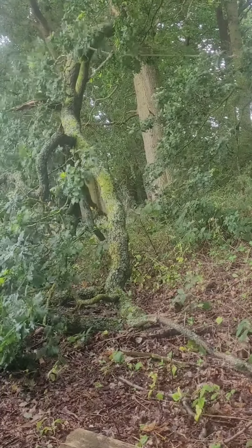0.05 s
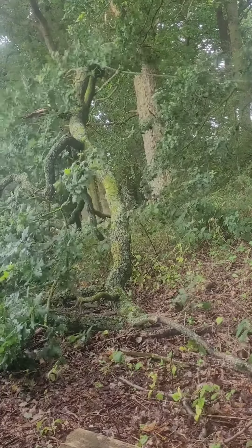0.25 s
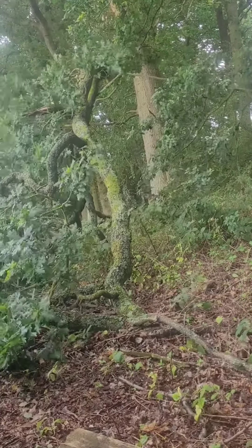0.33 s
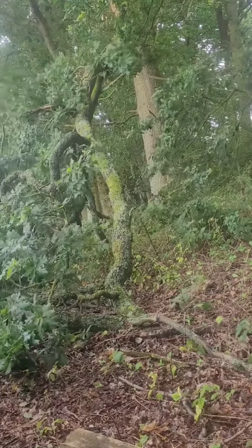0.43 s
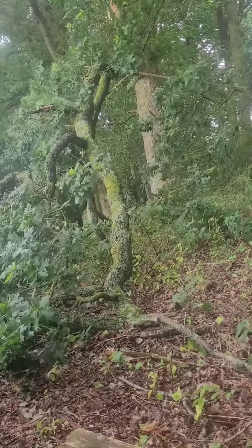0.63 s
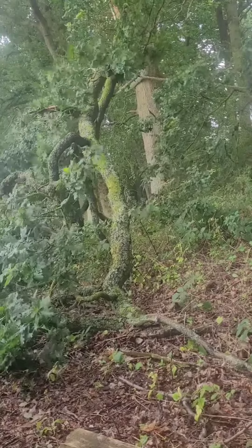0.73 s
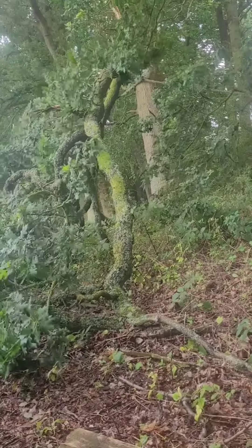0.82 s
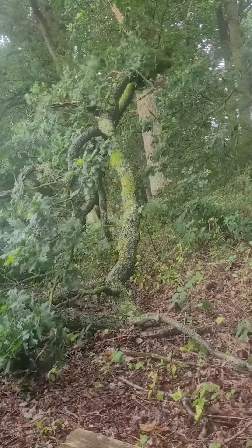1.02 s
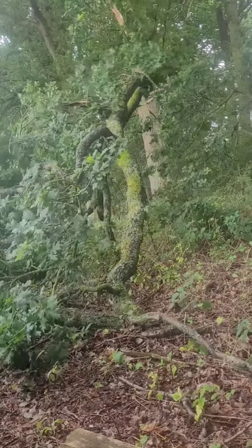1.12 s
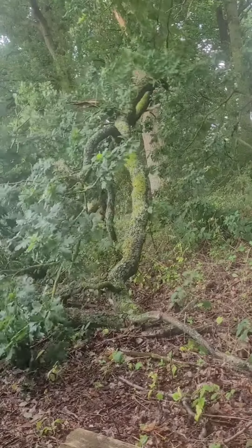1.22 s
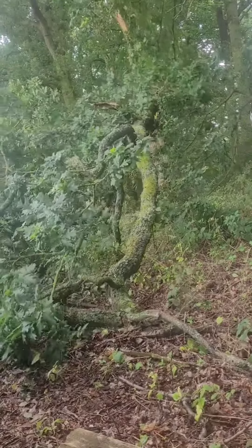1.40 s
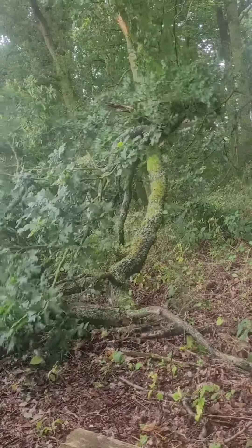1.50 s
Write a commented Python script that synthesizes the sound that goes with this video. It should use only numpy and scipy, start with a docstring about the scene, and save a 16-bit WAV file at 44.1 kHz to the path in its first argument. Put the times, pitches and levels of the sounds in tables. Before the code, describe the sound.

Wood cracking twice loudly as a tree limb comes down with swishing leaves.

```python
"""A leafy oak limb is pulled down in a wood, a few metres from the microphone. From the start, leaves
swish and twigs scrape over a low rumble of air. The fibres tear in a short run, then in two loud
cracks near half a second; each fracture excites the modes of the limb and scatters among the trunks.
From about one second the crown sinks onto the ground: stalks tick, twigs crunch and branches knock."""
import sys
import numpy as np
from scipy import signal
from scipy.fft import rfft, irfft
from scipy.io import wavfile

SR = 44100
rng = np.random.default_rng(int(sys.argv[2]) if len(sys.argv) > 2 else 0)


def file_out(sig):
    """Save sig as 16-bit WAV at sys.argv[1]."""
    # one column per channel
    cols = np.atleast_2d(sig).T
    # limit, then scale
    lim = np.clip(cols, -1, 1)
    pcm = np.round(lim * 32767).astype(np.int16)
    wavfile.write(sys.argv[1], SR, pcm)


N = 68355
T = np.arange(N) / SR
F = np.fft.rfftfreq(2 * N, 1 / SR)

# Fibre bundles breaking: start_s, thud_db, splinter_db, fizz_db, decay_s
FRACTURES = [(0.1433, -41, -29, -16, 0.0024), (.1490, -50, -54, -17, 0.0031),
             (0.2141, -21.5, -23.5, -16, 0.0031), (0.2227, -20.5, -22, -18, 0.0024),
             (0.2315, -34, -29, -19, 0.0011), (0.2433, -20.5, -10, -5.5, 0.0042),
             (.2480, -19, -16.5, -11, 0.01), (0.261, -33, -23, -20, 0.0025), (0.269, -27, -38, -22, 0.0018),
             (0.29, -20, -35, -26, 0.00049), (0.4368, -19.5, -45, -38, 0.0079),
             (0.444, -12.5, -21, -19, 0.0018), (0.4464, -16, -12.5, -5, 0.0048),
             (0.4485, -9, -11.5, -10, 0.0012), (.4560, -4, -13, -7.5, 0.0029),
             (0.4989, -11, -37, -28, 0.0036), (0.5038, -12, -31, -35, 0.0047),
             (.5100, -3.5, -14, -17, 0.0071), (0.5126, -3, -4, -12, 0.0027),
             (0.5142, -7, -5.5, -4, 0.00087), (0.518, -8, -31, -7, 0.0022),
             (0.5216, -5.5, -10.5, -2.5, 0.0029), (0.5344, -17.5, -10.5, -7.5, 0.0047),
             (.5520, -11, -18, -9, 0.002), (.5595, -15, -12.5, -13, .003), (0.592, -17.5, -34, -9.5, 0.014),
             (0.652, -22, -32, -14, 0.011)]
# Normal modes of the limb and of its splinters: pitch_hz, level_db, t60_s
LIMB_MODES = [(234.5, 13.5, 0.088), (276.4, -3.5, 0.097), (320, -2.5, 0.13), (433, -2, 0.17),
              (490, -15, 0.075), (654.5, -7.5, 0.42), (788, -2.5, 0.1), (1018, 5.5, 0.066),
              (1195, -12, 0.084)]
SPLINTER_MODES = [(4550, 0, 0.02), (4650, 5, 0.023), (5200, -11, 0.012), (5540, 3, 0.012)]
# Twigs crushed or snapped: start_s, level_db, pitch_hz, length_s
CRUNCHES = [(0.284, -27, 1310, .002), (0.3557, -18.5, 2290, .0015), (1.037, -26.5, 1200, .008),
            (1.1758, -20.5, 1250, 0.0032), (1.254, -24, 1730, 0.0098), (1.271, -21.5, 1550, .003),
            (1.37, -26.5, 810, 0.015), (1.386, -18.5, 1100, 0.011)]
# Branches colliding: start_s, level_db, pitch_hz, t60_s
KNOCKS = [(0.08, -24.5, 290, 0.07), (.110, -22, 221, 0.32), (0.2156, -22.5, 140, 0.076),
          (0.949, -27, 330, 0.055), (1.042, -22, 320, 0.068), (1.046, -24, 450, 0.07),
          (1.191, -25.5, 129, 0.18), (1.258, -25.5, 328, 0.049), (1.264, -27.5, 134, 0.27),
          (1.355, -15, 246, 0.093), (1.390, -20, 270, 0.061), (1.399, -20.5, 389, 0.054),
          (1.466, -20, 805, 0.09), (1.486, -23, 358, 0.039)]
# Leaf stalks flicking: start_s, level_db, pitch_hz, decay_s, left_minus_right_db
TICKS = [(.9825, -10, 13500, .0025, 2), (1.1078, -20, 13500, .001, 3), (1.251, -15, 12000, .005, 0),
         (1.4093, -19, 10300, .0015, -4), (1.5325, -18, 12500, .001, -3)]
# Ground under the crown: start_s, level_db, pitch_hz, t60_s (negative, so the tone grows)
GROUND_MODE = (1.482, -14, 54, -1.5)
# Spectral envelope of each source: frequency_hz, level_db
THUD_SPECTRUM = [(30, -35.5), (100, -16), (150, -6.5), (205, 5.5), (280, 6.5), (400, -1.5), (800, -4),
                 (1150, -3.5), (1500, -35), (2200, -16), (5000, -38), (16000, -44)]
SPLINTER_SPECTRUM = [(100, -35), (600, -7), (1200, 1), (2400, -1), (3700, -1), (4550, -6.5), (5000, -2.5),
                     (5550, -5), (6600, -11.5), (9000, -2), (16000, -35)]
FIZZ_SPECTRUM = [(500, -29.5), (4000, -16.5), (6500, 0.5), (8200, -1), (12500, 3), (14500, -1.5),
                 (16000, -1)]
LEAF_SPECTRUM = [(500, -24), (2000, -12), (2800, -7.5), (4500, -4.5), (6700, -9.5), (9000, -4.5),
                 (11000, -0.5), (13000, 2), (16000, -3.5)]
TWIG_SPECTRUM = [(150, -35.5), (500, 0), (1100, -5), (1900, 1), (2800, -3.5), (4000, -0.5), (5400, -6.5),
                 (6700, -30), (12000, -15)]
BOUGH_SPECTRUM = [(40, -11), (130, -20), (240, -8), (420, -9.5), (650, -18.5), (1100, -12.5), (2000, -39.5),
                  (8000, -31)]
AIR_SPECTRUM = [(15, -20), (28, -29), (40, -8), (54, -4.5), (80, -10.5), (130, -15.5), (300, -20.5),
                (1500, -42.5)]
# Envelope of the leaves: time_s, level_db, left_minus_right_db
LEAF_LEVELS = [(0, -40.5, 0.5), (.12, -41, 1.5), (.2, -38.5, 2), (.265, -31.5, 5.5), (.32, -34.5, 0.5),
               (.42, -37, 0.5), (.47, -33, 3), (.55, -28, 5), (.64, -39.5, 0), (.74, -37.5, 2.5),
               (.8, -42.5, 0.5), (.89, -42, 0), (.96, -36.5, 0.5), (1.015, -38, 0), (1.055, -35, 1.5),
               (1.16, -38, 2), (1.235, -38, 1), (1.265, -34, 0), (1.34, -36.5, 1.5), (1.44, -39.5, 0),
               (1.55, -35, 0.5)]
# Envelopes of the scraping twigs, the straining bough and the air: time_s, level_db
TWIG_LEVELS = [(0, -48), (.105, -43.5), (.14, -48), (.21, -47.5), (.27, -42.5), (.33, -44.5), (.4, -46.5),
               (.5, -36), (.58, -36), (.72, -42), (.8, -51), (.92, -48.5), (1.01, -49.5), (1.055, -42),
               (1.14, -53), (1.22, -48), (1.265, -39.5), (1.32, -49), (1.55, -50.5)]
BOUGH_LEVELS = [(0, -45), (.1, -45), (.18, -55.5), (.25, -35), (.33, -45.5), (.4, -42.5), (.55, -33.5),
                (.63, -49), (.74, -51.5), (.82, -52.5), (1, -52.5), (1.25, -46.5), (1.33, -49.5),
                (1.41, -49.5), (1.48, -44), (1.55, -51)]
AIR_LEVELS = [(0, -50), (.27, -46.5), (.55, -48), (.85, -54.5), (1.1, -56.5), (1.25, -58), (1.37, -52),
              (1.5, -46), (1.55, -45)]
# Imbalance of the two microphone ports: frequency_hz, left_minus_right_db
PORT_BALANCE = [(100, -1.5), (280, -1), (1000, 0.4), (2200, 0.5), (4500, -1.3), (8000, -2), (10000, -5.5),
                (13000, 0.5), (16000, 4.5)]

PORT_LAG_S, LAG_SPREAD_S = 0.0001924, 0.0001  # sound reaches the left port first
RUSTLE_WET_DB = 0.5  # scattered relative to direct sound, for the crown


def breaking_limb():
    """Brittle fracture: each fibre bundle releases its strain as a thud and a crackle that ring wood."""
    ring_growth = 2.45  # dB of ring per dB of crackle: only the big splinters ring
    blows, spray, snaps, fine_fibres = np.zeros((4, N))
    for start, thud_db, splinter_db, fizz_db, decay_s in FRACTURES:
        tear = unit(uneven_noise(spread_db=2.5) * np.exp(-T / decay_s))
        add(blows, start, undb(thud_db) * ((T == 0) + undb(-3) * tear))
        add(spray, start, undb(splinter_db) * tear)
        add(snaps, start, undb(ring_growth * splinter_db) * tear)
        add(fine_fibres, start, undb(fizz_db) * tear)
    limb_response = undb(5.5) * impulse(THUD_SPECTRUM) + undb(2.5) * struck(LIMB_MODES)
    body = low_cut(convolve(blows, limb_response), hz=154)  # too thin to radiate lower
    splinters = undb(9) * convolve(spray, impulse(SPLINTER_SPECTRUM))
    splinters += undb(3) * convolve(snaps, struck(SPLINTER_MODES))
    splinters += undb(5) * convolve(fine_fibres, impulse(FIZZ_SPECTRUM))
    return woodland(ports(body), wet_db=-6.5) + woodland(ports(splinters), wet_db=-0.5)


def crunching_twigs():
    """Progressive failure: a twig gives way in a short run of dry clicks with no clear pitch."""
    out = np.zeros(N)
    for start, db, hz, length_s in CRUNCHES:
        add(out, start, undb(db) * rasp(T < length_s, hz, width=0.66, spread_db=6.5))
    return undb(8.5) * woodland(ports(out), wet_db=-8)


def knocking_branches():
    """Cushioned impact: leaves soften a blow that excites one damped mode and a scrape of bark."""
    attack_s = 0.0012
    cushion = 1 - np.exp(-T / attack_s)
    out = np.zeros(N)
    for start, db, hz, t60 in KNOCKS:
        scrape = rasp(cushion * decay(t60), hz, width=0.64)
        tone = unit(cushion * ring(hz, t60))
        add(out, start, undb(db) * (tone + undb(-5) * scrape))
    radiated = low_cut(out, hz=101)  # thin branches radiate no bass
    return undb(5.5) * woodland(ports(radiated), wet_db=-6)


def ticking_stalks():
    """Transient excitation: each flick of a stalk is a fast-decaying band of treble noise."""
    width_hz = 2300
    out = np.zeros((2, N))
    for start, db, hz, decay_s, pan_db in TICKS:
        band = 1 / (1 + (2 * (F - hz) / width_hz) ** 2)
        tick = unit(filtered(rng.standard_normal(N), band) * np.exp(-T / decay_s))
        add(out, start, undb(db) * pan(pan_db) * ports(tick))
    return undb(4) * woodland(out, RUSTLE_WET_DB)


def rustling_crown():
    """Friction and strain: leaves brush, twigs scrape and the loaded bough crackles."""
    leaves = contacts(LEAF_SPECTRUM, per_s=3200, spread_db=0) * undb(curve(LEAF_LEVELS))
    twigs = contacts(TWIG_SPECTRUM, per_s=1000, spread_db=4) * undb(curve(TWIG_LEVELS))
    bough = contacts(BOUGH_SPECTRUM, per_s=350, spread_db=-1) * undb(curve(BOUGH_LEVELS))
    return leaves * pan(curve(LEAF_LEVELS, column=2)) + twigs + bough


def contacts(spectrum, per_s, spread_db, parts=5):
    """Shot noise: tiny random contacts in several parts of the crown sum to a rustle of unit rms."""
    out = np.zeros((2, N))
    for place in np.linspace(-1, 1, parts):
        touches = rng.random(N) < per_s / parts / SR
        polarity, size = rng.standard_normal((2, N))
        level_db = spread_db * np.minimum(size, 2) + flutter_db()
        clicks = touches * np.sign(polarity) * undb(level_db)
        out += ports(clicks, PORT_LAG_S + place * LAG_SPREAD_S)
    rustle = woodland(convolve(out, impulse(spectrum)), RUSTLE_WET_DB)
    return unit(rustle) * np.sqrt(N)


def flutter_db(surges_per_s=55, depth_db=3.6):
    """Stick-slip motion: sprays of leaves catch and slip, so their level surges at random."""
    knots = rng.standard_normal(400)
    return depth_db * np.interp(T * surges_per_s, np.arange(len(knots)), knots)


def air_rumble():
    """Partial coherence: low noise of the air, partly shared by the ports and stronger on the right."""
    noise = rng.standard_normal(N) + 0.88 * rng.standard_normal((2, N))
    rumble = unit(convolve(noise, impulse(AIR_SPECTRUM))) * np.sqrt(N)
    return rumble * undb(curve(AIR_LEVELS)) * pan(-4.5)


def yielding_ground():
    """A single mode: soft earth takes the crown's weight with a low tone, far fainter than the air."""
    start, db, hz, t60 = GROUND_MODE
    out = np.zeros(N)
    add(out, start, undb(db) * unit(ring(hz, t60)))
    return ports(out)


def woodland(x, wet_db, bass_t60_s=0.42, treble_t60_s=0.38, build_s=0.00043, crossover_hz=860):
    """Multiple scattering: trunks and ground add a diffuse tail whose bass is alike at both ports."""
    left, independent = rfft(rng.standard_normal((2, N)), 2 * N)
    bass = 1 / (1 + (F / crossover_hz) ** 2)
    coherence = 0.94 * bass
    right = (coherence * left + np.sqrt(1 - coherence ** 2) * independent) * delay(PORT_LAG_S)
    field = np.array([left, right])
    tail = irfft(field * bass)[:, :N] * decay(bass_t60_s)
    tail += irfft(field * (1 - bass))[:, :N] * decay(treble_t60_s)
    build_up = 1 - np.exp(-T / build_s)
    return x + undb(wet_db) * convolve(x, unit(tail * build_up))


def rasp(envelope, hz, width, spread_db=0):
    """Band-limited noise: clicks under an envelope, in a band about hz that broadens with width."""
    edge_ratio = np.sqrt(1 + 2 * width)
    band = signal.butter(2, [hz / edge_ratio, hz * edge_ratio], "band", fs=SR, output="sos")
    return unit(signal.sosfilt(band, uneven_noise(spread_db) * envelope))


def uneven_noise(spread_db):
    """Log-normal modulation: random sample sizes turn white noise into crackle."""
    return rng.standard_normal(N) * undb(spread_db * rng.standard_normal(N))


def struck(modes):
    """Modal superposition: the impulse response is a sum of damped sinusoids."""
    return unit(sum(undb(db) * ring(hz, t60) for hz, db, t60 in modes))


def ring(hz, t60):
    return np.sin(2 * np.pi * hz * T) * decay(t60)


def decay(t60):
    return np.exp(-np.log(1000) * T / t60)


def impulse(spectrum):
    """Minimum phase: folding the cepstrum gives a causal click with the given spectrum."""
    cepstrum = irfft(np.log(response(spectrum)))
    cepstrum[1:N] *= 2
    cepstrum[N + 1:] = 0
    return unit(irfft(np.exp(rfft(cepstrum)))[:N])


def response(spectrum):
    hz, db = np.array(spectrum).T
    return undb(np.interp(np.log(F + 1), np.log(hz), db))


def curve(rows, column=1):
    rows = np.array(rows)
    return np.interp(T, rows[:, 0], rows[:, column])


def ports(x, lag_s=PORT_LAG_S):
    """Path difference: the right microphone port receives the wave later than the left."""
    return np.array([x, filtered(x, delay(lag_s))])


def delay(lag_s):
    return np.exp(-2j * np.pi * F * lag_s)


def pan(db):
    return undb(np.array([db, -db]) / 2).reshape(2, -1)


def filtered(x, gain):
    return irfft(rfft(x, 2 * N) * gain)[..., :N]


def convolve(x, h):
    return filtered(x, rfft(h, 2 * N))


def low_cut(x, hz):
    return signal.sosfilt(signal.butter(4, hz, "high", fs=SR, output="sos"), x)


def add(out, start_s, x):
    i = int(start_s * SR)
    out[..., i:] += x[..., :N - i]


def unit(x):
    """Normalisation to a mean energy of one per channel."""
    return x / np.sqrt(np.mean(np.sum(x ** 2, axis=-1)) + 1e-18)


def undb(db):
    return 10 ** (np.asarray(db) / 20)


def scene():
    """Linear superposition: the pressures of all sources add at each port."""
    wood = breaking_limb() + crunching_twigs() + knocking_branches()
    return wood + ticking_stalks() + rustling_crown() + air_rumble() + yielding_ground()


def record(dry):
    """Frequency response: each port colours the sound, and a steep low-pass limits the bandwidth."""
    cutoff_hz = 15680
    tilt = np.sqrt(response(PORT_BALANCE))
    heard = filtered(dry, np.array([tilt, 1 / tilt]))
    return signal.sosfilt(signal.ellip(12, 0.1, 80, cutoff_hz, fs=SR, output="sos"), heard)


dry = scene()
out = record(dry)
file_out(out)
```